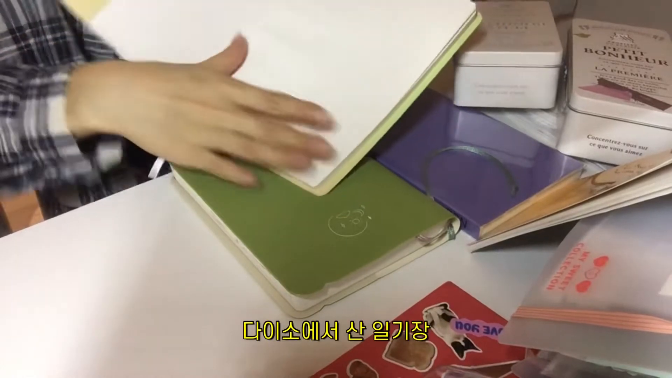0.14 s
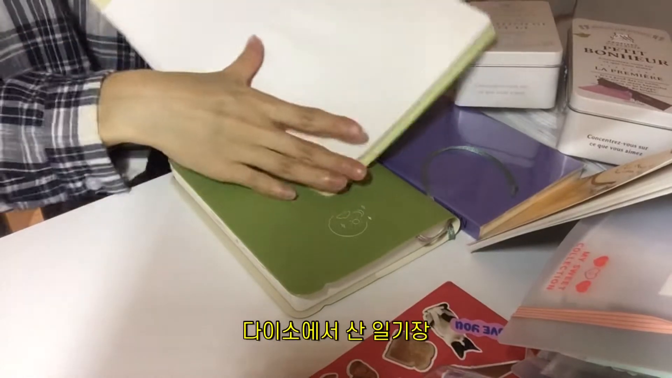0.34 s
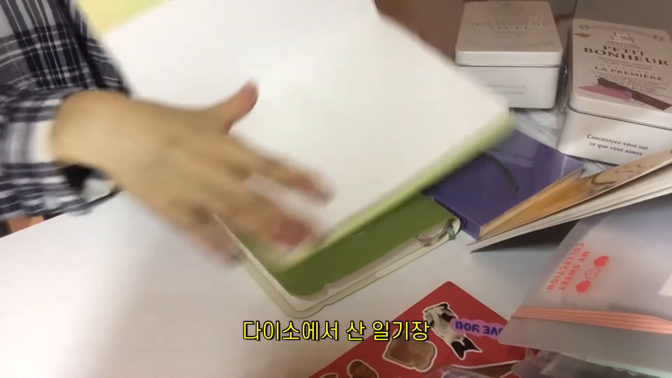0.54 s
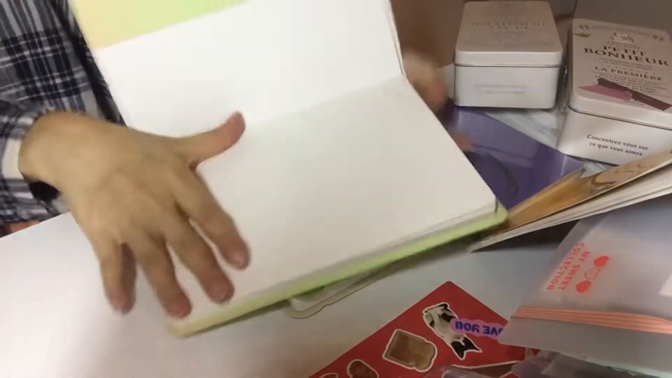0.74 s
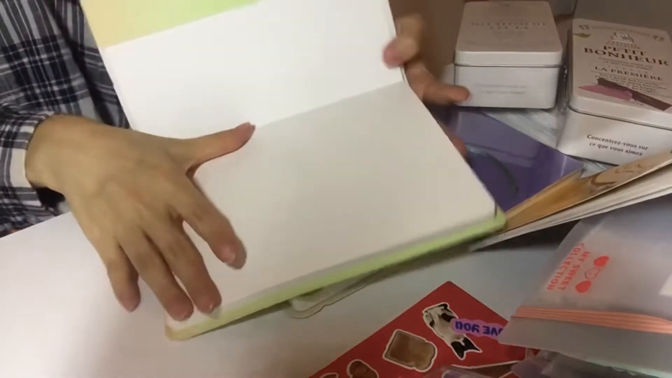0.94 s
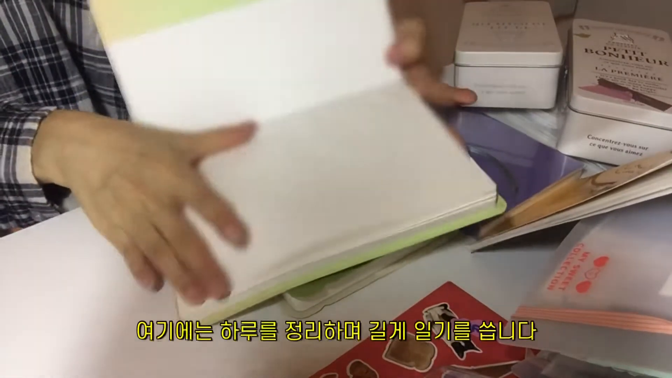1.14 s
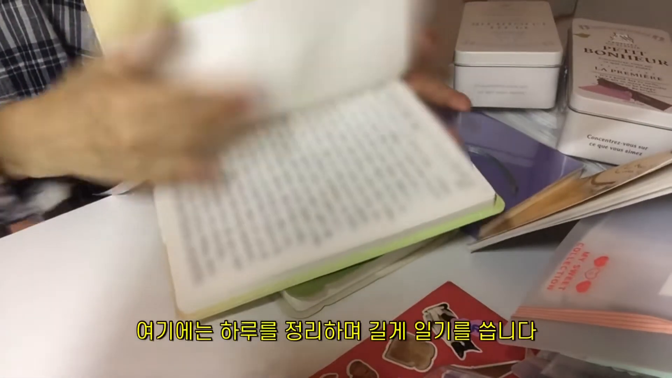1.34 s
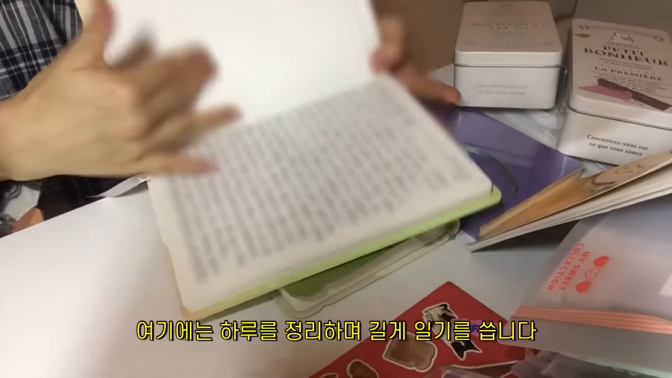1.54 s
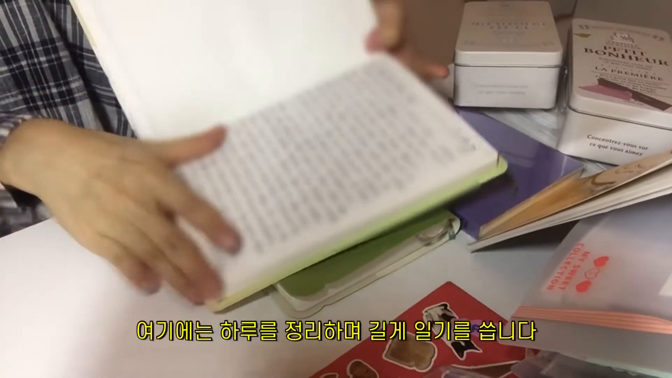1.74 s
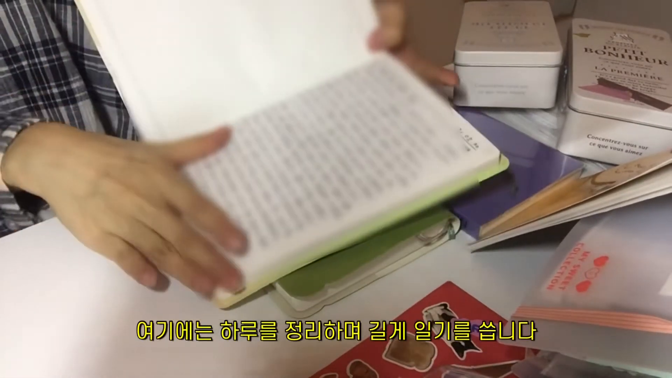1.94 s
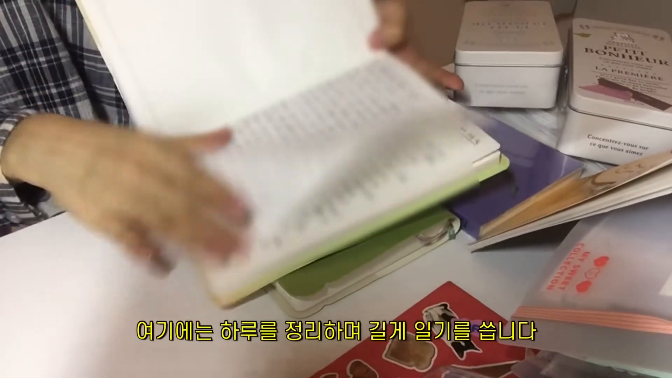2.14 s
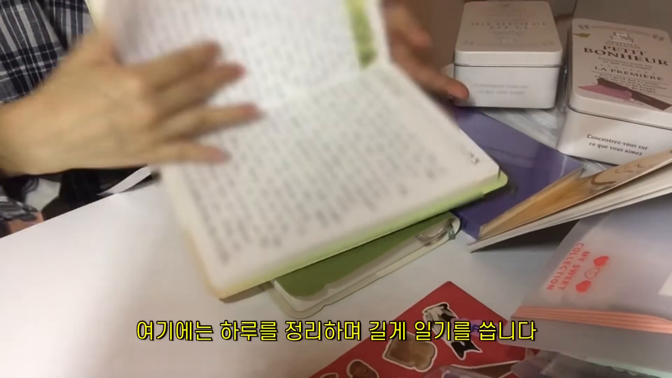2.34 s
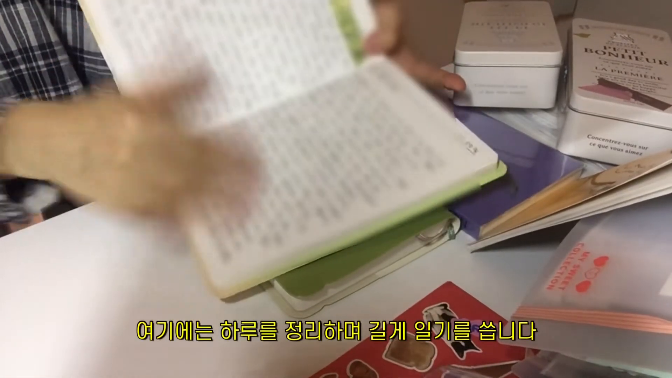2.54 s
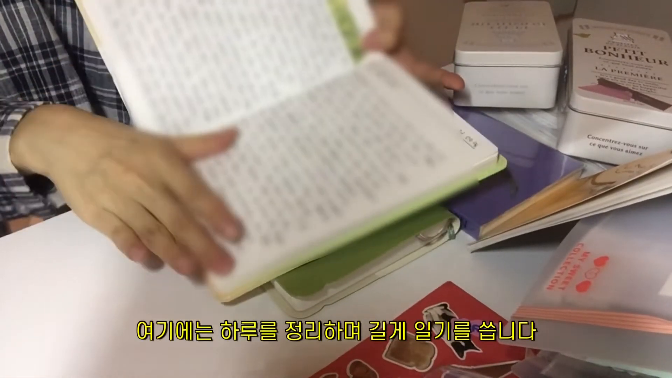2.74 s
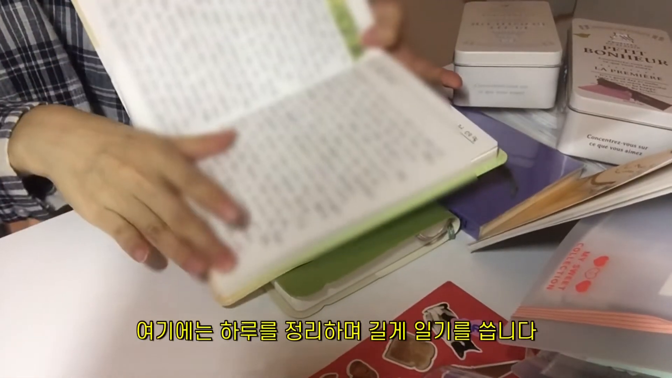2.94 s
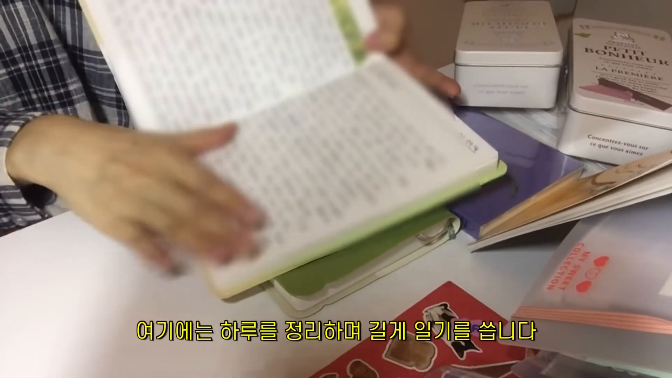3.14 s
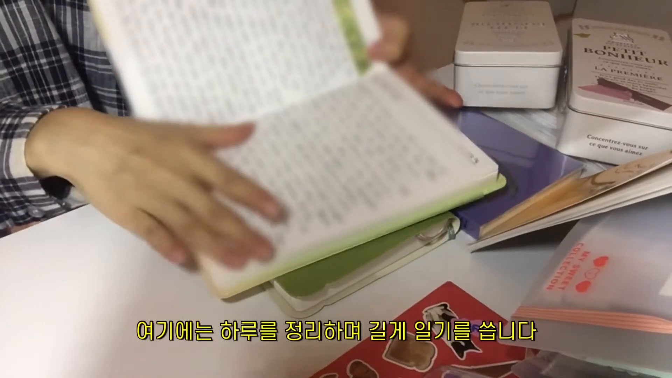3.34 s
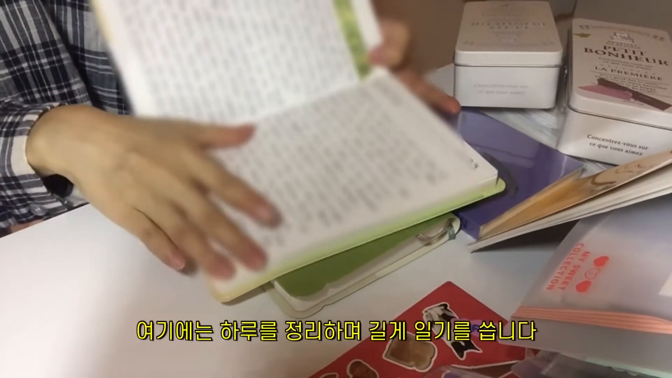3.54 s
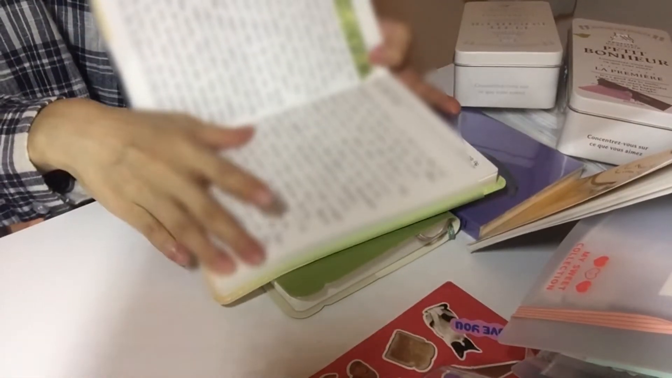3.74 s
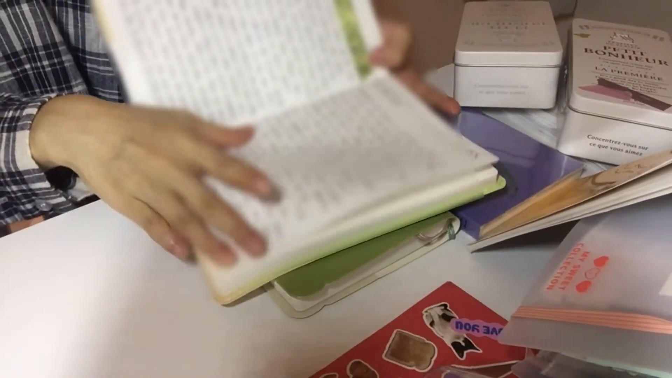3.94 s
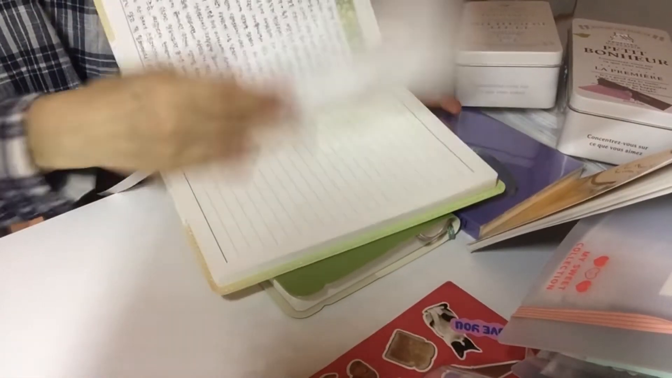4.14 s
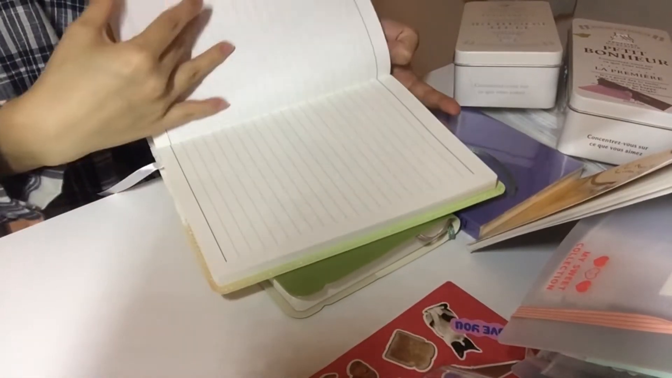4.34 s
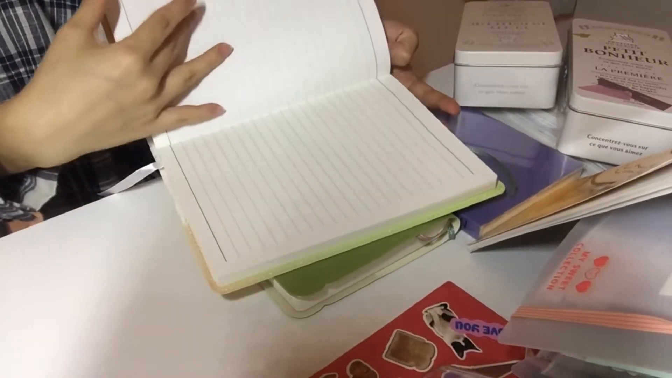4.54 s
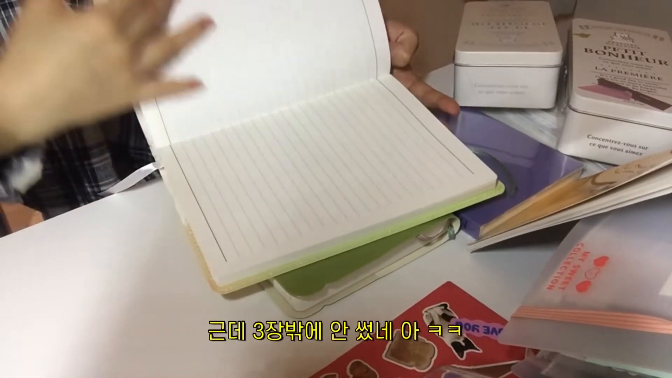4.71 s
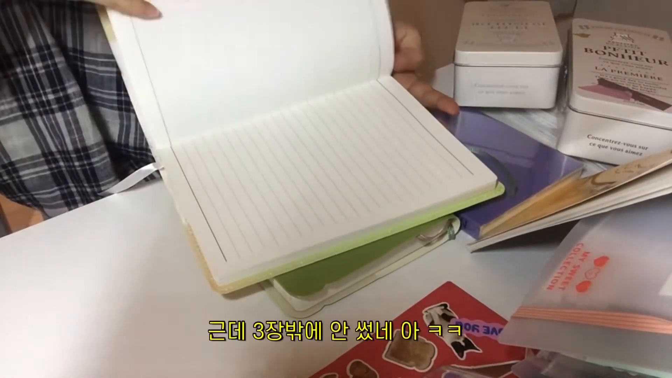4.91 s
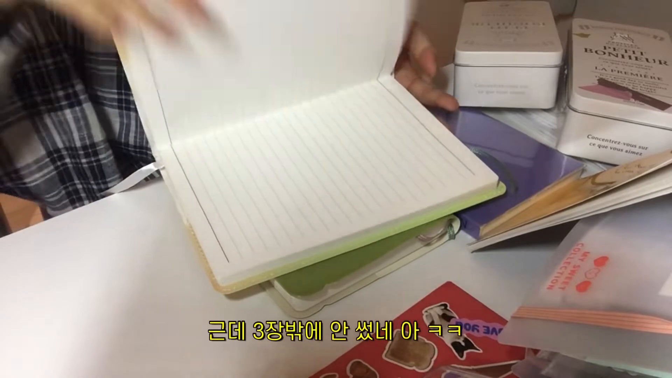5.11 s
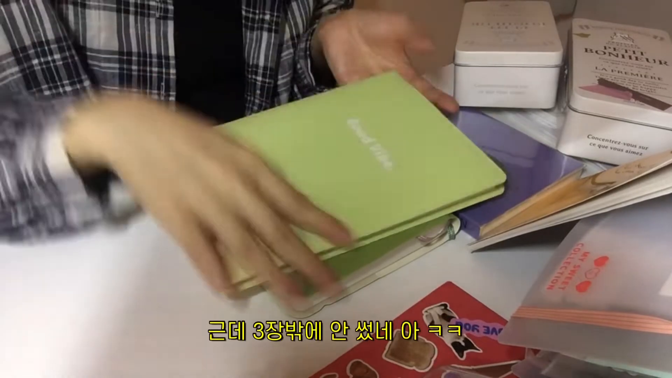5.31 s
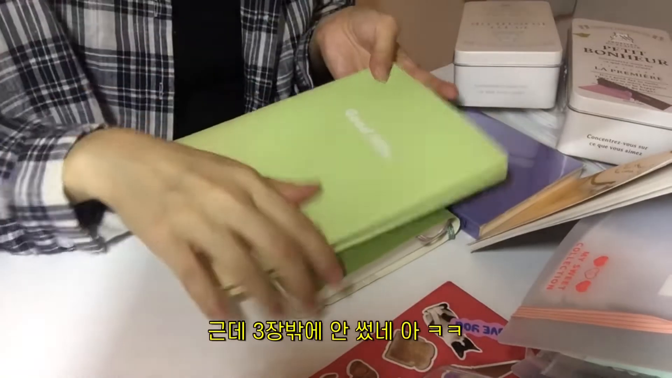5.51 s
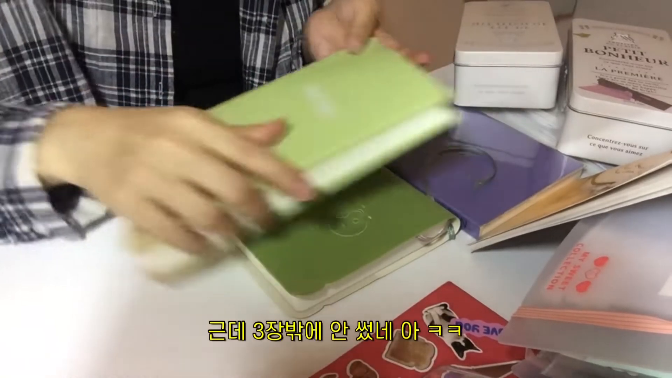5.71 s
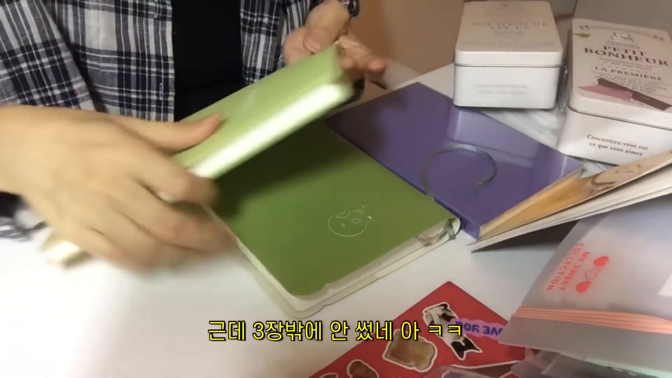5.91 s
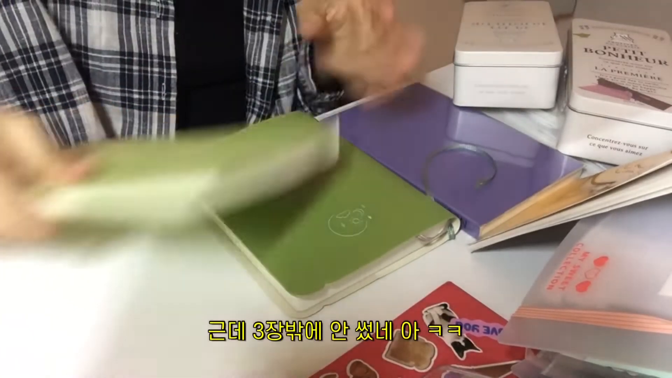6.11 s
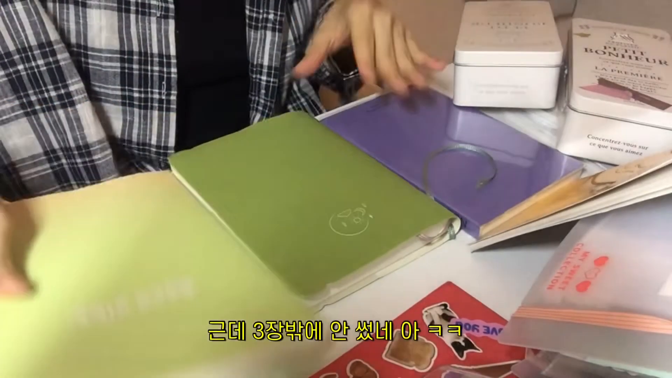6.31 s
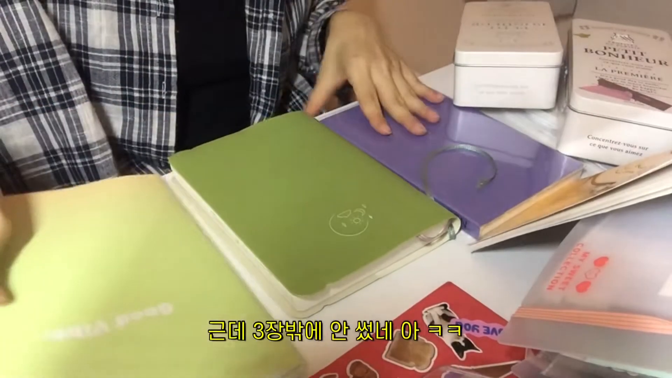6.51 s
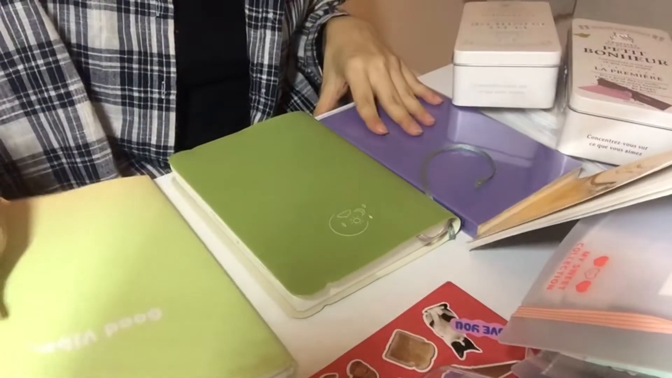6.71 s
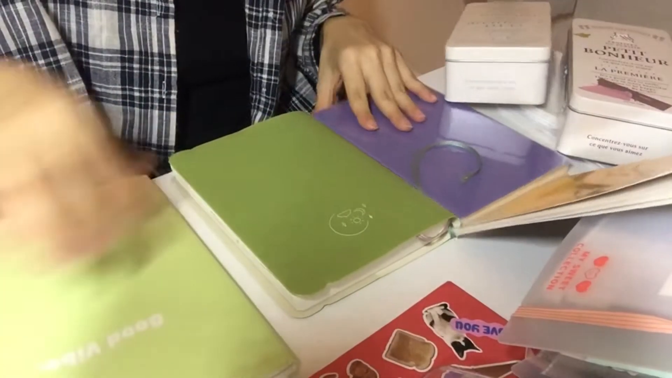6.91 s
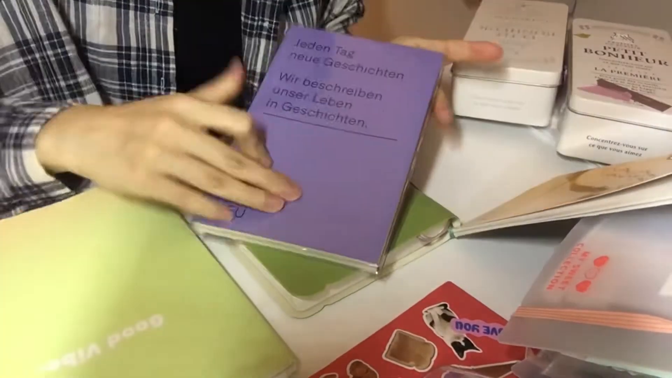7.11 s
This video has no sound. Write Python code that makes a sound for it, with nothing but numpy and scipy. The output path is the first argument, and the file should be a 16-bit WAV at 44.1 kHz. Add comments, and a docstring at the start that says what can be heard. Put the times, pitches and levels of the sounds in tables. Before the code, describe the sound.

Close dry paper rustles and sharp page flips over faint room hum, followed by soft book knocks, a tiny finger squeak and a heavier desk thud.

```python
"""A small quiet room hums while hands leaf through a notebook close to one microphone: patchy noise and low tones.
Fingers rub and drag the paper, as grainy resonant noise, and now and then a bent sheet sings as narrow gliding noise.
Pages buckle and snap over, as noise jolts through sheet resonances; the book is shut, laid on the desk and another
one is touched, as sinking pushes with ringing desk modes. Late on, a finger squeaks briefly: a pitch with overtones."""
import sys
import numpy as np
from scipy import signal
from scipy.fft import rfft, irfft, next_fast_len
from scipy.io import wavfile
from scipy.ndimage import uniform_filter1d, map_coordinates

SR = 44100
rng = np.random.default_rng(int(sys.argv[2]) if len(sys.argv) > 2 else 0)


def digitize_waveform(pressure):
    """Quantize a signal to 16-bit integers and store it at the path in sys.argv[1].

    Rows of a 2-D input are taken as channels; values are limited to [-1, 1].
    """
    field = np.atleast_2d(pressure).T
    bounded = np.clip(field, -1, 1)
    quanta = np.round(bounded * 32767).astype(np.int16)
    wavfile.write(sys.argv[1], SR, quanta)


N = 320166

# colour of fine paper hiss and of bright crack tips: (frequency [Hz], level [dB])
HISS_COLOUR = [(5000, -44.5), (8500, 0), (10500, 1.5), (12500, 1.5), (15500, -5)]


def amp(db):
    """dB to gain."""
    return 10 ** (np.asarray(db) / 20)


def unit(x):
    """Scale to rms 1."""
    return x / np.sqrt(np.mean(x ** 2) + 1e-20)


def along(points, hz):
    """Interpolate (frequency [Hz], value) points on a log frequency axis."""
    f, v = np.transpose(points)
    return np.interp(np.log(hz + 1), np.log(f + 1), v)


def wobble(rate):
    """A smooth random curve with rate knots a second."""
    knots = rng.standard_normal(int(N * rate / SR) + 4)
    return map_coordinates(knots, [np.arange(N) * rate / SR])


def filtered(x, response):
    """Filter x by a function of frequency, padded so that tails do not wrap."""
    m = next_fast_len(x.shape[-1] + 8192)
    spectrum = rfft(x, m) * response(np.fft.rfftfreq(m, 1 / SR))
    return irfft(spectrum, m)[..., :x.shape[-1]]


def mode(f, hz, width):
    """One causal resonance of peak gain 1."""
    return 1j * f * width / (hz * hz - f * f + 1j * f * width)


def rush(response, patchy_db):
    """Coloured noise of rms 1 whose gain varies in patches of time and frequency."""
    z = signal.stft(rng.standard_normal(N), nperseg=512)[2]
    field = uniform_filter1d(rng.standard_normal(z.shape), size=8, axis=0)
    field = uniform_filter1d(field, size=8, axis=1)
    patchy = signal.istft(z * amp(patchy_db * unit(field)), nperseg=512)[1][:N]
    return unit(filtered(patchy, response))


def add(track, s, sound):
    """Mix a sound in at s seconds."""
    part = track[round(s * SR):][:len(sound)]
    part += sound[:len(part)]


def room_tone():
    """Broad room noise and a few wavering low tones, each a narrow band of noise."""
    # spectrum of the room noise: (frequency [Hz], level [dB per Hz])
    air_colour = [(15, -55), (25, -19.5), (48, 0.5), (70, -2.5), (91, -23.5), (107, -10.5), (179, -9),
                  (269, -11), (361, -9.5), (572, -15.5), (710, -13), (881, -16.5), (1360, -21.5),
                  (15800, -41.5)]
    # unsteady low tones: (frequency [Hz], width [Hz], level [dB])
    hum_bands = [(60.4, 1.5, -69), (120, 20, -73), (179, 21, -71), (229, 34, -87), (304.2, 18, -73)]
    level_db = -63 + 1.3 * wobble(9.0)
    air = amp(level_db) * rush(lambda f: amp(along(air_colour, f)), patchy_db=-1.5)
    hum = 0
    for hz, width, db in hum_bands:
        tone = filtered(rng.standard_normal(N), lambda f: mode(f, hz, width) ** 2)
        hum = hum + amp(db) * unit(tone)
    return air + hum


def stroke(t, start, length, rise, fall):
    """dB below full contact: climbs to the start, holds, drops after the end (rise and fall in dB per s)."""
    return -rise * np.clip(start - t, 0, None) - fall * np.clip(t - start - length, 0, None)


def handling():
    """Levels in dB of skin, flutter and hiss: the powers of all sweeps, turns and rubs add up."""
    # hands never quite still on the book: (skin [dB], flutter [dB], hiss [dB])
    holding = (-82.5, -79.5, -87)
    # a finger drags the top page aside, slow at first, then fast: (start [s], speed-up [s], time taken [s],
    # stop [s], skin on paper [dB], flutter above skin [dB], slow and fast hiss above skin [dB])
    sweeps = [(1.128, 1.185, .018, 1.252, -43.5, -6.5, -38.5, -4.5),
              (2.033, 2.143, 0.025, 2.24, -38.5, -12.5, -21, -2),
              (3.855, 4.011, 0.035, 4.138, -40.5, -13.5, -30.5, 0)]
    # the freed page swings over and settles: (start [s], length [s], skin [dB], flutter above skin [dB],
    # hiss above skin [dB], fading of skin [dB per s], fading of flutter [dB per s])
    turns = [(1.425, .11, -42, -1, -21, 90.1, 70.4), (2.27, .17, -43, -7.5, -9.5, 83, 30),
             (4.18, .22, -38.5, -3, -19, 92.7, 169)]
    # short rubs of hands, sleeves, covers and sheets: (start [s], length [s], skin [dB], flutter above skin [dB],
    # hiss above skin [dB], swell over the length [dB], slope of both edges [dB per s])
    rubs = [(.035, 0.012, -70.5, -7, -8.5, 3, 257.4), (.525, 0.01493, -66, 2, -4.5, -5, 230),
            (.575, 0.0357, -72, 14.5, 2.5, -6.5, 299.6), (.62, 0.07, -59.5, -9, -3, 0.5, 262),
            (.74, .052, -66, -0.5, -18, 8, 420), (1.075, 0.11, -67.5, 1.5, -32, -1.5, 448),
            (1.3, .046, -49.5, -15, 1.5, -1.5, 910), (1.33, .04, -64, 13, -3, -4, 504),
            (1.382, 0.024, -47.5, -15, -2.5, 4, 708), (1.53, .085, -63.5, 6.5, -6, -7.5, 399.4),
            (1.629, 0.041, -61, -6, 4, -1, 901), (1.754, 0.038, -70, 5, -15, 0, 248.3),
            (2.52, 0.1, -65.5, -5, 4, 0.5, 600), (2.714, 0.015, -71.5, 17.5, 1, 2.5, 1305),
            (3.1, .2, -83.5, -1.5, -6, 1.5, 89.5), (3.88, 0.033, -64, -5.5, -7.5, 0, 300),
            (4.149, 0.092, -62.5, -11.5, 9, -6.5, 303.7), (4.57, 0.065, -78, -7.5, -16, -0.5, 200),
            (4.669, .145, -64.5, -9, -6.5, 6, 331), (4.932, 0.055, -52.5, -2, -14.5, 3, 507),
            (5.074, 0.046, -54.5, -5.5, -11.5, 0.5, 417.4), (5.31, 0.035, -65, 2.5, -1, 4, 400),
            (5.79, 0.051, -74.5, 1, -8.5, 0.5, 108.5), (5.985, .012, -66, 0, -7.5, -6.5, 251),
            (6.028, 0.033, -62.5, -26, 2, -2.5, 417), (6.165, .03, -75.5, 12, 0, -4, 308.4),
            (6.245, .04, -51, -11, -8, -8, 899), (6.3, 0.032, -55, -10, -5.5, 4, 400.5),
            (6.39, 0.0178, -65.5, 18, -11, -8.5, 297), (6.438, 0.053, -55, -8, -3.5, -9, 397.7),
            (6.551, 0.021, -63.5, 9.5, 1, -3.5, 678), (6.748, 0.033, -63.5, 0, -1, -3, 352.5),
            (6.8, 0.071, -67, 9, -8, -5.5, 447), (6.915, 0.093, -67, 0.5, -11, -5, 201),
            (7.085, 0.007, -72, -8.5, -11.5, 2.5, 299)]
    grip_s, sweep_fall = 0.07, 800  # time to press down fully [s]; drop after letting go [dB per s]
    # full speed adds the first to skin, flutter and hiss alike, and the second to flutter only
    fast_gain_db, fast_flutter_db = -0.95, -3
    turn_rise, turn_fall = 320, 810  # dB per s
    hiss_fade = 0.3  # share of the skin's fading during a turn

    t = np.arange(0, N / SR + 0.002, 0.001)
    levels = [np.array(holding)[:, None] + 0 * t]
    for start, quick, taking, stop, db, flutter_db, hiss_db, fast_hiss_db in sweeps:
        fast = (1 + np.tanh((t - quick) / taking)) / 2
        grip_db = 20 * np.log10(np.clip((t - start) / grip_s, 1e-4, 1))
        skin = db + grip_db + fast_gain_db * fast - sweep_fall * np.clip(t - stop, 0, None)
        flutter = skin + flutter_db + fast_flutter_db * fast
        hiss = skin + hiss_db + (fast_hiss_db - hiss_db) * fast
        levels.append([skin, flutter, hiss])
    for start, length, db, flutter_db, hiss_db, fade, flutter_fade in turns:
        edge = db + stroke(t, start, length, turn_rise, turn_fall)
        age = np.clip(t - start, 0, length)
        flutter = edge + flutter_db - flutter_fade * age
        hiss = edge + hiss_db - hiss_fade * fade * age
        levels.append([edge - fade * age, flutter, hiss])
    for start, length, db, flutter_db, hiss_db, swell_db, edge in rubs:
        swell = swell_db * np.clip((t - start) / length, 0, 1)
        skin = db + swell + stroke(t, start, length, edge, edge)
        levels.append([skin, skin + flutter_db, skin + hiss_db])
    total = 10 * np.log10(np.sum(amp(levels) ** 2, axis=0))
    return [np.interp(np.arange(N) / SR, t, row) for row in total]


def sliding():
    """Paper fibres catch and slip: noise with a fast grain, through the page's resonances."""
    # page under the finger, before speed shifts and tilts it: (frequency [Hz], width [Hz], level [dB])
    page_modes = [(2250, 1000, -6), (3950, 1300, 0), (6150, 1800, 0), (8400, 2600, -13)]
    # colour of the fluttering sheet: (frequency [Hz], level [dB])
    flutter_colour = [(350, -40), (800, -8), (1400, -2.5), (2400, -7.5), (3200, -12), (6000, -32.5)]

    def page(f, tilt_db):
        """Page resonances in alternating polarity, tilted by tilt_db per octave about 5 kHz."""
        tilt = tilt_db * np.log2([hz / 5000 for hz, _, _ in page_modes])
        return sum((-1) ** k * amp(db + tilt[k]) * mode(f, hz, width) ** 2
                   for k, (hz, width, db) in enumerate(page_modes))

    skin_db, flutter_db, hiss_db = handling()
    grain = wobble(220)
    slow = rush(lambda f: page(f, tilt_db=-6.0), patchy_db=-2.67)
    fast = rush(lambda f: page(f / 1.07, tilt_db=5.0), patchy_db=3.5)
    # a faster stroke hisses more and lifts the page's colour: equal-power blend
    speed = np.pi / 2 * np.clip((hiss_db - skin_db + 18.0) / 22, 0, 1)
    skin = unit(amp(1.1 * grain) * (np.cos(speed) * slow + np.sin(speed) * fast))
    flutter_noise = rush(lambda f: amp(along(flutter_colour, f)), patchy_db=5.0)
    flutter = unit(amp(0.45 * grain + 2.6 * wobble(50)) * flutter_noise)
    hiss = unit(amp(grain) * rush(lambda f: amp(along(HISS_COLOUR, f)), patchy_db=1.2))
    return amp(skin_db) * skin + amp(flutter_db) * flutter + amp(hiss_db) * hiss


def thuds():
    """Each landing is a push whose pitch sinks (bending waves carry highs first); the nearest desk modes ring on."""
    # books and hands landing: (time [s], level before trim [dB], settled pitch [Hz], decay stretch [ratio])
    landings = [(0.262, -49, 82.5, 0.2), (0.798, -54.5, 68.5, 2.8), (1.333, -48.5, 320, 1.2),
                (1.41, -29.5, 234, 1.1), (1.731, -45.5, 95.5, 0.76), (1.773, -52, 70.4, 0.63),
                (1.868, -54.5, 91.5, 0.62), (1.931, -55.5, 75, 0.55), (2.291, -35.5, 199, 1.2),
                (2.331, -35, 260, 1.5), (2.633, -36, 148.5, 0.52), (4.178, -35.5, 199, 1.9),
                (4.236, -36, 219, 0.85), (4.948, -49, 185, 3.2), (5.212, -55, 96, 1.4),
                (5.293, -35, 159, 0.34), (5.336, -28, 133, 0.5), (5.377, -47.5, 144.3, 2.7),
                (5.47, -32, 289, 0.67), (5.834, -53, 244, 0.92), (5.971, -51.5, 151, 0.68),
                (6.239, -36.5, 111.6, 1.3), (6.361, -27, 122, 0.66), (6.801, -19.5, 260, 0.82),
                (6.817, -24, 89.7, 0.82), (6.959, -33, 267, 0.71)]
    # desk modes before each blow's variation: (frequency [Hz], level [dB], t60 before stretch [s])
    desk_modes = [(60, -1.5, .16), (92, 1, .18), (146.1, -3, .24), (207.4, -3.5, .14), (255, -4, .13),
                  (320.6, -1.5, .15), (436, -3, .12), (532, -1, 0.29), (669, -5.5, .13)]
    focus_base_db, focus_grows = 4, 0.22  # loss per octave from the pitch of a -30 dB blow; more per dB softer
    soft_slope = 0.82  # extra loss per octave above the pitch, for each dB softer than -20 dB
    ring_share = 0.5  # the desk's ring against the push

    out, t = np.zeros(N), np.arange(SR // 2) / SR
    for s, db, pitch_hz, stretch in landings:
        focus_db = focus_base_db - focus_grows * (db + 30)
        soft_db = soft_slope * max(-20 - db, 0)
        luck = rng.standard_normal((len(desk_modes), 2)) * [2.5, 0.025]  # dB, share of pitch
        cycles = t * pitch_hz
        turns = cycles + 0.43 * (1 - np.exp(-cycles / 0.45))  # starts almost an octave high
        push = cycles * np.exp(1 - cycles / 1.1) * np.sin(2 * np.pi * turns)
        ring = 0
        for (hz, level, t60), (luck_db, detune) in zip(desk_modes, luck):
            octaves = np.log2(hz / pitch_hz)
            mode_db = level - focus_db * abs(octaves) - soft_db * max(octaves, 0) + luck_db
            decay = amp(mode_db - 60 * t / (t60 * max(stretch, 0.2)))
            onset = 1 - np.exp(-t * hz / 1.3)
            ring = ring + decay * onset * np.sin(2 * np.pi * hz * (1 + detune) * t)
        # loose things on the desk roughen the ring
        rattle = 1 + 0.074 * np.interp(t * 180, np.arange(90), rng.standard_normal(90))
        blow = push / np.abs(push).max() + ring_share * rattle * ring / np.abs(ring).max()
        add(out, s + 0.0015, amp(db + 1.0) * blow / np.abs(blow).max())
    return out


def snaps():
    """A buckle jolts and runs across the sheet in a few milliseconds; the sheet then shivers around its own pitch."""
    # paper buckling and fingertip ticks, levels before trims: (time [s], sheet ring [dB],
    # crack above ring [dB], bright tip above ring [dB], ring pitch [Hz])
    buckles = [(0.386, -55, -8, -30, 1190), (.546, -53.5, -7, -3, 720), (.6, -48, 0, -11, 900),
               (1.18, -48.5, -15.5, -19.5, 650), (1.195, -45, -23, -31, 646),
               (1.329, -41.5, 0, -24.5, 1078), (1.341, -34.5, -22, -37.5, 670), (1.348, -28, -3, -19, 1370),
               (1.358, -37, -15, -33, 770), (1.402, -25, -25, -29.5, 1500), (1.408, -22, -12, -29, 2250),
               (1.4224, -3.5, -2, -36.5, 1960), (1.427, -10, -30, -56, 1330),
               (1.432, -16.5, -30, -54.5, 1440), (1.446, -18.5, -32, -55, 1340),
               (1.522, -41, -3.5, -24.5, 612), (1.592, -51, -16.5, -30, 616),
               (2.228, -35, -11.5, -25, 1090), (2.255, -25, -32, -24, 1370), (2.272, -28, -8, -18, 980),
               (2.294, -21, -17, -22.5, 2550), (2.305, -21.5, -22, -18, 1920),
               (2.311, -19.5, -29, -30, 1550), (2.327, -16.5, -6, -25, 2410), (2.335, -20, -30, -36.5, 960),
               (2.34, -32, -30, -36, 1800), (2.351, -23, -32, -30.5, 2300), (2.3686, -17.5, -15, -36, 1680),
               (2.39, -32, -30, -31, 720), (2.419, -40, 11, -12.5, 2572), (2.629, -38, -18, -20.5, 796),
               (2.686, -55, -9, -27.5, 1743), (2.723, -48.5, -8, -20.5, 2012),
               (4.154, -36.5, -15.5, -26, 1492), (4.175, -18.5, -27, -40, 1470),
               (4.189, -16, -12, -39, 3320), (4.192, -17.5, -28, -40, 1110),
               (4.217, -20.5, -28, -30.5, 1810), (4.235, -12, -1, -10, 1190),
               (4.244, -19.5, -28, -26.5, 1806), (4.253, -18, -31, -38.5, 1740),
               (4.259, -16.5, -32, -40.5, 2200), (4.272, -28, -39, -35, 1490),
               (4.363, -44.5, -25, -20, 2330), (4.951, -18.5, -7, -33, 1340), (4.962, -28, -39, -30, 2250),
               (5.098, -48.5, -18, -20, 680), (5.109, -44, -7.5, 1, 3330), (5.195, -54, -2, -6.5, 648),
               (5.297, -31.5, -16, -12, 1120), (5.331, -43, 3.5, 1.5, 797), (5.473, -25, -1.5, -15, 928),
               (5.688, -42, -26.5, -31, 839), (5.702, -49.5, -18, -15, 900), (5.843, -48.5, -5.5, -30, 823),
               (5.941, -50.5, -18, -12, 730), (5.9833, -36.5, -5.5, -26, 772),
               (6.156, -38, -15.5, -24, 796), (6.236, -29, -16.5, -12.5, 1130),
               (6.329, -38, -12, -24, 1500), (6.361, -25.5, -17, -25, 1120), (6.367, -33, -30.5, -40, 1050),
               (6.788, -31, -20.5, -27, 880), (6.799, -31, -17, -25, 1100),
               (6.806, -36.5, -24.5, -44.5, 1865), (6.821, -40, -35, -13.5, 670)]
    # colour of the cracks: (frequency [Hz], level [dB])
    crack_colour = [(1200, -18.5), (2500, -5.5), (4000, -2.5), (6000, 1.5), (8000, -3), (10500, -21)]
    shiver_s, shiver_slope = 0.033, -0.17  # aftershock t60 at 1 kHz [s]; power of pitch it follows
    crack_s, crack_grows = 0.00055, 0.025  # rise up to -20.5 dB [s]; octaves longer per dB louder
    tap_width = 0.2  # a struck spot's ring before spread widens it, as a share of its pitch

    rings, cracks, tips = np.zeros((3, N))
    t = np.arange(SR // 12) / SR

    def run(rise):
        """A pulse that peaks at 1 after rise seconds."""
        return t / rise * np.exp(1 - t / rise)

    def peak(x):
        """Scale to peak 1."""
        return x / np.abs(x).max()

    for s, db, crack_db, tip_db, hz in buckles:
        abrupt = np.clip((crack_db + 26) / 20, 0, 1)  # the louder the crack, the quicker the buckle
        # a faint tap rings one spot, a strong buckle shakes the whole sheet
        spread = np.clip((db + 46) / 22, 0.05, 1)
        t60 = shiver_s * (hz / 1000) ** shiver_slope
        push_noise, crack_noise, tip_noise = rng.standard_normal((3, len(t)))
        aftershocks = amp(-60 * t / max(t60, 0.005)) * (1 - np.exp(-t / 0.0022))
        buckle = run(0.0015 - 0.00082 * abrupt)
        push = (buckle + (1.7 - 0.96 * abrupt) * aftershocks) * push_noise

        def sheet(f):
            """The struck spot's resonance and a broad one of the whole sheet."""
            spot = (1 - 0.45 * spread) * mode(f, hz, 0.45 * hz) ** 2
            return spot + 0.55 * spread * mode(f, 2100, 4000) ** 2

        shiver = filtered(push, sheet)
        tap = filtered(run(0.0001), lambda f: mode(f, hz, (tap_width + 0.75 * spread) * hz) ** 2)
        burst = run(crack_s * 2 ** (crack_grows * max(db + 20.5, 0))) + 0.05 * aftershocks
        add(rings, s, amp(db + 2.5) * peak(peak(shiver) + (2.2 - 1.5 * spread) * peak(tap)))
        add(cracks, s, amp(db + crack_db + 1.5) * burst * crack_noise)
        add(tips, s, amp(db + tip_db + 2.5) * burst * tip_noise)

    def dull(f):
        """The sheet is too limp to ring far above 5.5 kHz."""
        return 1 / (1 - (f / 5500) ** 2 + 1.4j * f / 5500)

    ringing = filtered(rings, dull)
    cracking = filtered(cracks, lambda f: amp(along(crack_colour, f)))
    return ringing + cracking + filtered(tips, lambda f: amp(along(HISS_COLOUR, f)))


def singing():
    """A resonance of the bent sheet sings as it slides: narrow noise around a pitch that glides with the bend."""
    # singing sheets: (start [s], length [s], level before trim [dB], middle pitch [Hz], glide over length [octaves])
    bands = [(1.081, 0.11, -54, 3660, -.05), (1.158, 0.21, -45.5, 5500, .15),
             (2.038, 0.22, -49.5, 5710, -.03), (2.041, .07, -50.5, 1316, .15),
             (2.092, 0.092, -46, 2125, .05), (3.874, 0.062, -44, 3850, 0.021),
             (3.926, 0.21, -40, 6200, -0.0022), (3.934, 0.091, -42, 2250, -0.17),
             (4.6, .24, -60.5, 3670, -0.032), (4.045, .085, -36, 6230, -0.09),
             (4.962, 0.14, -51.5, 2344, .25), (6.428, 0.039, -52, 5400, 0.056)]
    width, rise, fall = 0.12, 800, 690  # noise cutoff as a share of pitch; edges [dB per s]
    out, t = np.zeros(N), np.arange(-SR // 10, SR // 2) / SR
    for start, length, db, hz, glide in bands:
        pitch = hz * 2 ** (glide * (np.clip(t / length, 0, 1) - 0.5))
        noise = rng.standard_normal((2, len(t)))
        a, b = [unit(filtered(v, lambda f: 1 / (1 + (f / (width * hz)) ** 2))) for v in noise]
        phase = 2 * np.pi * np.cumsum(pitch) / SR
        level = amp(db - 8.5 + stroke(t, 0, length, rise, fall))
        add(out, start + t[0], level * (a * np.cos(phase) + b * np.sin(phase)))
    return out


def squeak():
    """Skin sticks and slips regularly for a moment: an unsteady pitch with overtones."""
    # a finger on a glossy cover: (time [s], pitch [Hz], level [dB])
    slip_points = [(6.528, 722, -62), (6.538, 829, -52.5), (6.552, 895, -55), (6.563, 861, -49),
                   (6.572, 777, -55.5)]
    s, hz, db = np.transpose(slip_points)
    t = np.arange(N) / SR
    pitch = np.interp(t, s, hz) * (1 + 0.035 * wobble(300))
    phase = 2 * np.pi * np.cumsum(pitch) / SR
    tone = amp(-3.5) * np.sin(phase) + np.sin(2 * phase) + amp(-23.0) * np.sin(3 * phase)
    return amp(np.interp(t, s, db, left=-200, right=-200)) * tone


def walls(x):
    """Each frequency of the room's answer dies at its own speed; every half second gets a fresh tail."""
    # decay of the room: (frequency [Hz], t60 [s])
    room_decay = [(100, 0.3), (1000, 0.17), (4000, 0.063), (12000, 0.06)]
    out, step = np.zeros(N), SR // 2
    for i in range(0, N, step):
        hz, t, z = signal.stft(rng.standard_normal(SR // 3), SR, nperseg=256)
        decay = amp(-60 * t / along(room_decay, hz)[:, None])
        tail = signal.istft(z * decay, SR, nperseg=256)[1]
        answer = signal.fftconvolve(x[i:i + step], tail / np.linalg.norm(tail))
        add(out, i / SR + 0.0037, answer)  # 3.7 ms after the direct sound
    return out


def scene():
    """One microphone feeds both channels; only snaps and thuds excite the walls."""
    paper, desk = snaps(), thuds()
    reverb = walls(amp(-9.5) * paper + amp(-15.5) * desk)
    mono = room_tone() + sliding() + desk + paper + singing() + squeak() + reverb
    return np.array([mono, mono])


def record(dry):
    """The microphone thins deep bass and dips in the treble, the input rounds peaks, a band limit cuts the top."""
    dip_hz, dip_width_hz, dip_share = 10530, 1000, 0.34
    top_hz = 15900

    def colour(hz):
        """Bass roll-off around 48 Hz and the treble dip."""
        bass = (hz * hz / (48 ** 2 - hz * hz + 1j * hz * 60)) ** 2
        return bass * (1 - dip_share * mode(hz, dip_hz, dip_width_hz))

    coloured = filtered(dry, colour)
    rounded = coloured / (1 + np.abs(coloured / 0.93) ** 6) ** (1 / 6)
    return filtered(rounded, lambda hz: hz < top_hz)


dry = scene()
out = record(dry)
digitize_waveform(out)
```